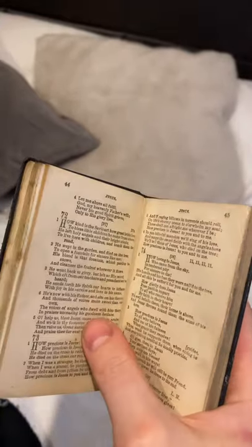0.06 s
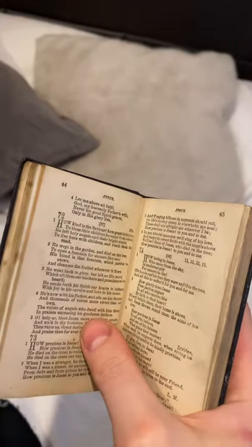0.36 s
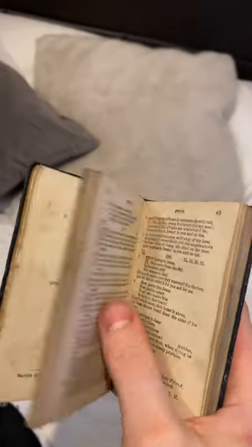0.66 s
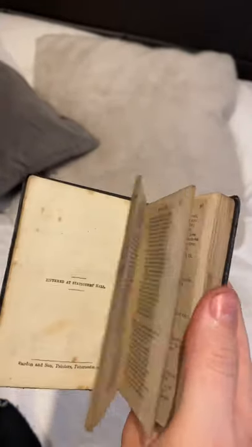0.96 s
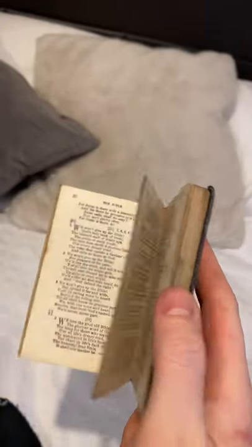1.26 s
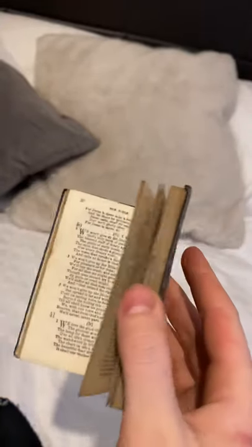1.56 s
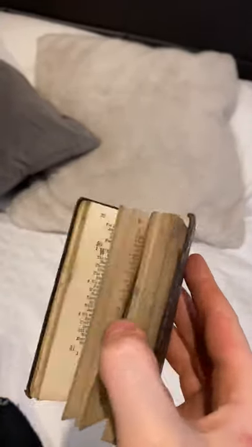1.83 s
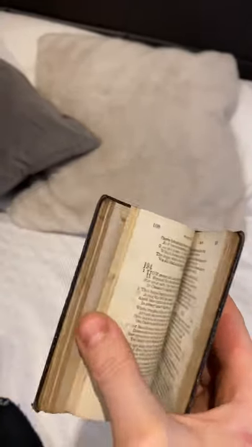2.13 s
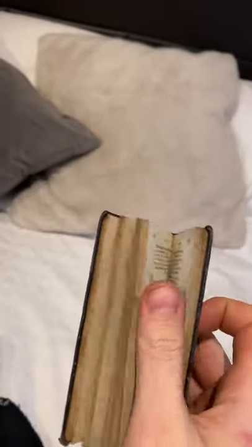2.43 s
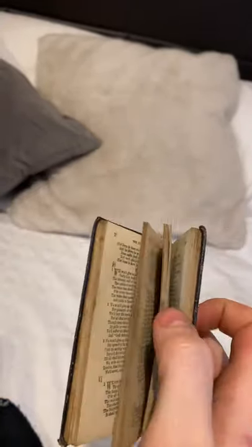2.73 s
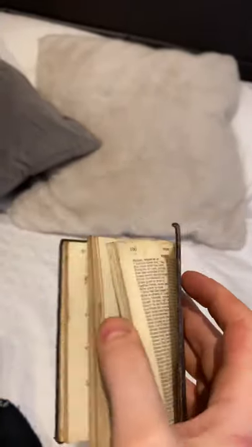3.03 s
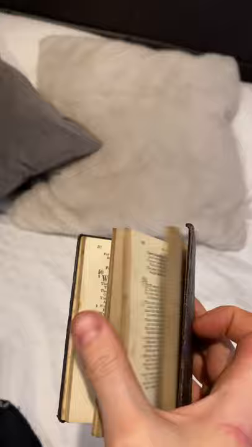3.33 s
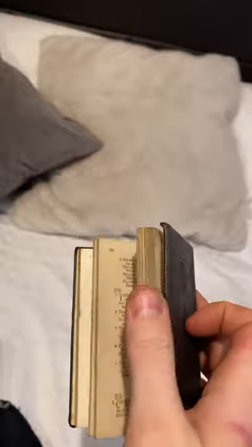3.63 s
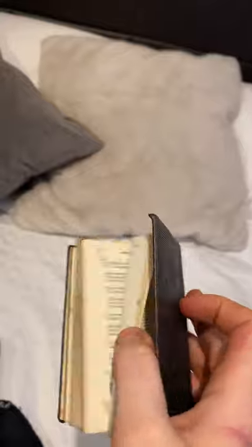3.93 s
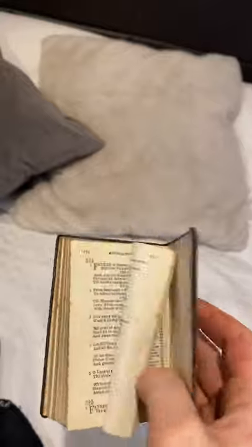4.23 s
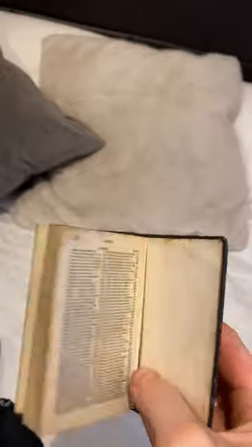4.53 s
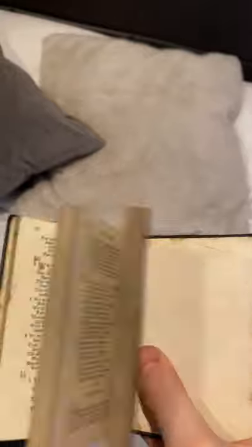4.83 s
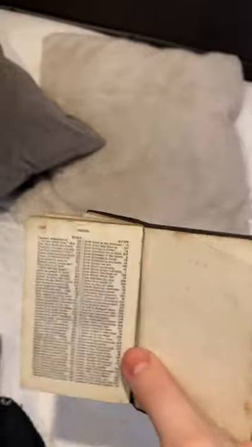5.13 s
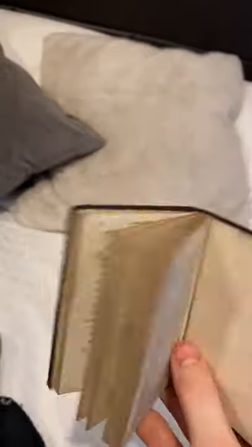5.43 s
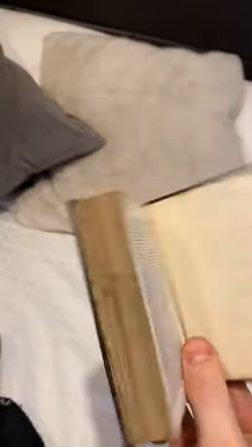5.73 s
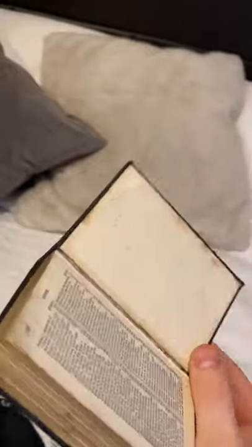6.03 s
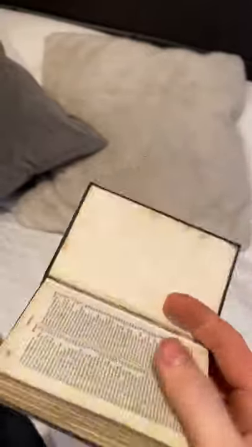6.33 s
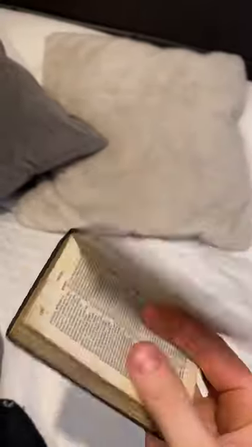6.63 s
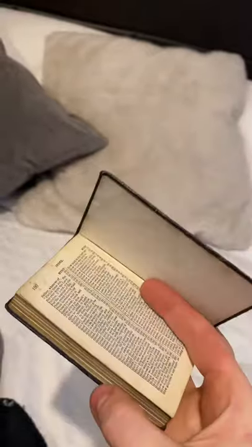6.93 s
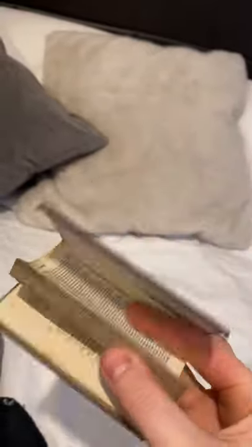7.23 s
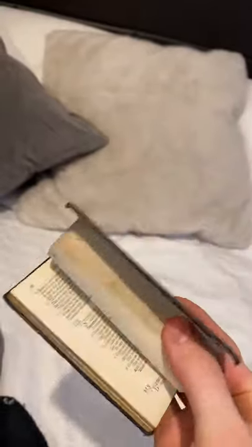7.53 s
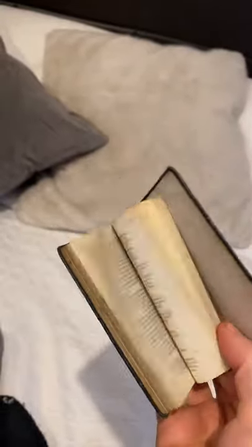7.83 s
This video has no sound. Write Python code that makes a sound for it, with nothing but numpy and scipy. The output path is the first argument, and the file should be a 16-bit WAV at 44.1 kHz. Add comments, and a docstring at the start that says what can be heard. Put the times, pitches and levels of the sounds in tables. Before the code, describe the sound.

Soft, papery swishes come and go as the pages of an old book are thumbed near the microphone in a quiet bedroom. Small dry clicks from the binding and gentle handling bumps dot the rustling. A crisp page snap stands out midway, and a second comes near the end, followed by a last flurry of paper. Dull room tone and a faint hum lie underneath.

```python
"""The pages of a small old book, leafed through in one hand close to a phone in a quiet bedroom.
Paper hisses on paper, bending sheets rustle, and the thumb rubs dully over their edges.
The dry binding ticks as its folds give way, and a few leaves snap free of the thumb.
The hand gives some soft bumps; underneath lies a dull room tone with a low steady mains hum."""
import sys
import numpy as np
from scipy import signal
from scipy.fft import rfft, irfft
from scipy.io import wavfile

SR = 44100
rng = np.random.default_rng(int(sys.argv[2]) if len(sys.argv) > 2 else 0)


def digitize_waveform(pressure):
    """Quantize a signal to 16-bit integers and store it at the path in sys.argv[1].

    Rows of a 2-D input are taken as channels; values are limited to [-1, 1].
    """
    field = np.atleast_2d(pressure).T
    bounded = np.clip(field, -1, 1)
    quanta = np.round(bounded * 32767).astype(np.int16)
    wavfile.write(sys.argv[1], SR, quanta)


N = 347067
T = np.arange(N) / SR
HZ = np.maximum(np.fft.rfftfreq(N, 1 / SR), 1)

# tone colour of the room's rush: f/Hz, relative level/dB
ROOM_COLOUR = [(20, -22), (36, -3), (55, 1), (120, 6), (160, -1), (220, 4.5), (350, -4.5), (560, 4),
               (740, -8), (900, -3), (1150, -17), (2000, -29), (3500, -35), (4900, -37), (5900, -34.5),
               (7200, -41.5), (10000, -49), (16000, -57)]
# narrow room resonances: f/Hz, width/Hz, relative level/dB
ROOM_MODES = [(118.4, 11, -83.5), (193.1, 11, -64), (231.6, 12, -68.5), (300.2, 26, -65.5), (400, 13, -63),
              (447.5, 14, -70.5), (507, 14, -76), (541.6, 10, -64), (579.5, 12, -69), (662, 36, -66.5),
              (868.4, 48, -65.5)]
# stereo image of the room, mono in the bass and wide on top: f/Hz, left-right correlation
ROOM_CORRELATION = [(50, 0.99), (130, 0.96), (290, 0.89), (640, 0.35), (1400, 0), (4000, 0), (12000, 0.081)]
# partials of the mains hum: f/Hz, rms level/dB
HUM_PARTIALS = [(50, -71.5), (100, -70)]
# the book as the two microphone ports hear it: f/Hz, left lead/rad, left minus right/dB
MIC_PORTS = [(100, 0, 0), (700, -.4, -1), (1250, -.2, -2.5), (2000, .45, -1.8), (3100, 1.25, -4.5),
             (4250, 1.1, 0), (4700, .9, -2.5), (5200, .6, 2), (5800, .65, 0), (8000, 1.5, 0),
             (10000, 2.2, 0), (12000, 2.92, 0), (13500, 3.02, 0), (16000, 3.08, 0)]
# soft bumps of hand and book: t/s, level/dB, f/Hz, length/s
HAND_BUMPS = [(0.589, -37, 47.9, 0.19), (0.592, -37.5, 95.2, 0.066), (1.942, -40, 60.8, 0.017),
              (2.412, -43, 414, 0.0085), (4.284, -42.5, 145, 0.029), (4.289, -46, 68, 0.067),
              (4.286, -43.5, 395, 0.026), (5.53, -45, 65.5, 0.031), (6.659, -39.5, 126.5, 0.012),
              (6.663, -36, 190, 0.013), (7.495, -45.5, 72, 0.051), (7.496, -49, 360, 0.015),
              (7.837, -42, 397, 0.009)]
# ticks of the binding and of stiff leaves:
# t/s, relative level/dB, ring f/Hz, low-pass f/Hz, crackle over click/dB, ring half-width/octaves
FOLD_TICKS = [(0.031, -44, 1170, 4000, -6.5, 0.85), (0.25, -43.5, 1700, 2250, -8, 0.42),
              (0.3035, -33, 2200, 2980, -15, 0.55), (0.317, -41.5, 1960, 3300, -6, 0.43),
              (1.204, -52.5, 1500, 2500, -10, 0.4), (1.259, -52, 1370, 3000, -7, 0.18),
              (1.638, -49, 1500, 3500, -12, 0.43), (1.8776, -46.5, 1270, 4000, -12, 0.28),
              (1.9315, -40, 1840, 3000, -6, 0.22), (1.9359, -21, 2000, 3040, -16.5, 0.23),
              (1.9411, -29.5, 1810, 3000, -5, 0.23), (1.9753, -35, 1720, 2820, -22, 0.24),
              (2.4114, -29, 1070, 3480, -10.5, 0.43), (2.418, -43, 1170, 2800, -1, 0.33),
              (2.423, -39, 1100, 1800, -7, 0.51), (2.44, -47, 1260, 2500, -6, 0.38),
              (2.6789, -25.5, 1220, 2060, -44, 0.28), (2.743, -30.5, 1140, 1770, -1, 0.37),
              (2.744, -30, 1180, 2035, -31, 0.35), (2.754, -36, 1210, 1720, -10, 0.38),
              (2.8, -45, 1210, 1700, -14, .4), (3.085, -26.5, 1720, 6000, -9, 0.4),
              (3.0963, -25.5, 1640, 5530, -9.5, 0.35), (3.331, -49, 1250, 2200, -12, 0.37),
              (3.425, -42, 1140, 2400, -11, 0.38), (3.449, -43.5, 1220, 2030, -5.5, 0.31),
              (3.604, -47, 1070, 1603, -7, 0.32), (3.8787, -43.5, 1330, 5000, -2.5, 0.47),
              (4.269, -31.5, 1950, 3500, -1, .25), (4.284, -20, 1030, 11000, -11.5, 0.3),
              (4.2861, -5, 8300, 15500, -21.5, .4), (4.2868, -6.5, 5400, 13000, -25, .45),
              (4.288, -12.5, 4000, 9000, -13, 0.4), (4.2934, -23.5, 2380, 6000, -2, 0.4),
              (4.6734, -43, 1070, 5000, -11, 0.29), (4.844, -47, 1300, 3000, -3, 0.33),
              (5.113, -44.5, 2260, 9000, -9, 0.36), (5.449, -38, 1545, 2950, 4.5, 0.33),
              (5.513, -42.5, 1950, 6100, -9, 0.32), (5.847, -41, 1270, 3500, -12, 0.52),
              (6.2192, -28, 2700, 9900, -20, 0.39), (7.239, -32, 905, 2400, -14, 0.31),
              (7.4915, -25.5, 1470, 4000, -0.5, 0.89), (7.4953, -8, 2640, 6900, -27, 0.26),
              (7.4956, -12.5, 1660, 3500, -19, 0.26), (7.75, -48, 1920, 12200, -19, 0.56),
              (7.834, -21, 1200, 7950, -23, 0.46), (7.845, -30, 2390, 6000, -9, 0.35),
              (7.8486, -26, 2370, 12000, -14, 0.32), (7.8602, -32, 2640, 12000, -3, 0.42)]
# leaf edges snapping free: t/s, level/dB, drag/s, lift of the highest treble/dB
EDGE_FLICKS = [(0.599, -59, .00018, 12), (1.6367, -50, 0.00022, -12), (1.8143, -61, 0.00022, 8),
               (1.8213, -67, .0002, 8), (1.8751, -55.5, 0.00062, 14), (1.935, -38.5, 0.0032, 0),
               (2.072, -55, .0002, -2), (2.147, -53, 0.00018, 9), (2.9953, -57, 0.00018, 8),
               (3.084, -55, 0.00042, -11), (3.0958, -55, .0003, -5), (3.78, -67, .0002, 15),
               (3.9151, -50.5, 0.01, -3), (3.919, -57, .0003, 5), (4.263, -31, .002, 0),
               (4.272, -30, 0.0026, 9), (4.2859, -12.5, .0004, -6), (4.2886, -19.5, 0.00069, -10),
               (4.4456, -60, .0004, 9), (4.4772, -49, 0.00023, 12), (4.5, -48.5, 0.00073, 8),
               (4.6816, -61, .0008, 15), (4.798, -61, .0003, 9), (4.814, -63, .0004, 7),
               (4.8368, -43.5, 0.00052, 7), (4.876, -60, .0004, 1), (4.8883, -52, .0003, 3),
               (5.4535, -50, 0.00033, 10), (5.4607, -53, .0002, 5), (5.511, -55, .0002, 7),
               (5.574, -51, 0.00029, -13), (6.2188, -35, 0.00016, 6), (6.6576, -44, 0.00025, 18),
               (7.476, -40, .0057, 1), (7.4957, -22, 0.00038, -1), (7.7508, -53, 0.00033, -2)]
# tone colours of thumb rub, bending sheet, paper hiss and edge flick: f/Hz, relative level/dB
RUB_COLOUR = [(300, -11.5), (750, -8.5), (1250, -4.5), (1600, -5.5), (2200, -25.5), (4000, -35.5)]
FLEX_COLOUR = [(700, -24.5), (1400, 5.5), (1950, 8.5), (2900, 6), (3800, 4), (6000, -13.5), (12000, -42)]
HISS_COLOUR = [(1000, -23), (2500, -13.5), (4200, 7), (4800, -2.5), (5300, 6.5), (6400, 5.5), (7600, 3),
               (9500, 5.5), (12500, 4.5), (14500, 3), (15800, 0)]
FLICK_COLOUR = [(150, -4), (500, -22.5), (1000, -5), (1500, -10.5), (2400, 4), (3200, -6), (4500, 1.5),
                (7300, 3.5), (9500, 2), (12000, 1), (15500, -1)]
# the first leaf swings open, then the leaves stay loosely fanned: t/s, gap/m
LEAF_GAP = [(.59, 0.0083), (.9, 0.092), (1.3, .05)]
# voice of the moving sheet: t/s, papery resonance f/Hz, resonance height/dB, hiss centre f/Hz
SHEET_SHAPE = [(.62, 2800, 6.5, 9380), (.76, 3230, 10.5, 7480), (1.0, 2320, -1, 5950),
               (1.94, 1954, 0.5, 6460), (2.2, 1850, 2.5, 6280), (3.1, 2314, 1.5, 5400),
               (3.75, 1702, 2.5, 5990), (3.95, 1904, 15.5, 7920), (4.22, 2250, 8, 6660),
               (4.4, 2280, 4, 7040), (5.0, 2112, 3, 6820), (5.24, 2700, 7, 7500), (5.45, 1924, 2.5, 6970),
               (5.75, 2240, 4, 6020), (5.92, 2030, 4, 9170), (6.3, 2620, 0.5, 7660), (6.5, 2435, 1.5, 6700),
               (7.25, 2283, 1, 6520), (7.35, 3960, 4.5, 5430), (7.45, 4040, 11.5, 7220),
               (7.55, 2580, 10, 5980), (7.83, 2700, 5.5, 6260)]
# slides of leaves and thumb:
# start t/s, rise/s, fall/s, flex level/dB, hiss over flex/dB, rub over flex/dB
PAGE_SLIDES = [(0, 0.0065, 0.086, -68, -2, -31), (.09, 0.0065, 0.018, -68.5, -3.5, -3),
               (0.595, 0.0044, 0.033, -64.5, -3.5, -20), (.607, 0.023, 0.087, -61.5, 0, -30),
               (.64, 0.052, 0.16, -65, 6, -28), (.76, 0.13, 0.15, -74.5, 3.5, -4),
               (1.015, 0.064, 0.18, -74, -1.5, -2), (1.25, 0.016, 0.031, -73, -0.5, -5),
               (1.53, 0.19, 0.055, -72.5, -1.5, 0), (1.8, 0.017, .1, -81.5, 4, 4),
               (1.85, 0.023, .01, -72.5, 6.5, -5), (1.857, 0.12, 0.044, -55, -5, -6),
               (2.0, 0.092, 0.033, -66, 2.5, -2), (2.118, 0.058, 0.15, -59.5, 3, -5),
               (2.28, 0.06, 0.1, -64.5, 0.5, -6), (2.379, 0.019, 0.17, -72, -3.5, 12.5),
               (2.484, 0.014, 0.1, -63.5, -2, -2), (2.58, 0.055, 0.1, -68, -3.5, 5),
               (2.7, 0.059, 0.42, -87.5, -3, 20), (2.98, 0.031, 0.051, -65.5, -2, -1),
               (3.037, 0.034, 0.11, -56.5, -5.5, -3), (3.132, 0.045, 0.08, -58.5, -3, 0),
               (3.24, 0.033, 0.09, -68, 0, 2.5), (3.355, 0.028, 0.1, -71.5, -3.5, 10),
               (3.485, 0.014, 0.017, -81.5, 4.5, -6), (3.58, 0.19, 0.15, -74, -8, 5.5),
               (3.874, 0.062, 0.17, -61.5, 0.5, -7), (4.139, 0.095, 0.13, -59.5, 5, -39),
               (4.22, 0.05, 0.017, -49.5, 0.5, -35), (4.285, 0.006, 0.091, -62.5, 4, 6.5),
               (4.321, 0.11, 0.4, -70, 5, 4), (4.51, 0.092, 0.045, -64, 2, 3),
               (4.639, 0.063, 0.18, -68, 1.5, 5.5), (4.672, .007, 0.017, -73, 7, 8),
               (4.789, 0.037, 0.044, -69, 6, 8), (4.875, 0.035, 0.14, -67, -1, 2.5),
               (4.901, 0.1, 0.065, -62.5, 5.5, -9), (5.001, 0.046, 0.035, -60.5, -0.5, -9),
               (5.11, 0.037, .04, -82, -3.5, 2), (5.16, 0.021, 0.12, -69, 6, 0.5),
               (5.213, 0.024, 0.029, -56, -2, -3), (5.27, 0.046, 0.0644, -67, 2.5, 6),
               (5.372, 0.042, 0.063, -59, 2.5, -1), (5.44, 0.022, 0.1, -62.5, -0.5, 5.5),
               (5.52, .06, .3, -82, 3.5, -12), (5.67, 0.018, 0.16, -73, 8, -7),
               (5.773, 0.0144, 0.045, -69, 3, -1.5), (5.83, 0.098, 0.08, -68, 8, -5),
               (5.92, 0.069, .016, -68, 5, -5), (5.99, 0.037, 0.27, -74.5, -2.5, -11.5),
               (6.075, 0.084, 0.16, -73, 3.5, 6), (6.193, 0.03, 0.055, -63, 7.5, 0),
               (6.24, 0.075, 0.14, -70.5, 7.5, -1.5), (6.4, 0.075, 0.12, -67.5, 10.5, -4),
               (6.51, 0.046, .045, -72, 7, -5), (6.616, 0.046, 0.04, -63.5, 4.5, -9),
               (6.66, 0.045, .1, -69.5, 2.5, -9), (6.81, 0.073, 0.064, -66.5, -2, -8),
               (6.995, 0.017, 0.05, -64, 1.5, 3.5), (7.05, 0.069, 0.66, -70.5, -4, -3),
               (7.21, 0.056, 0.037, -55, 3, 1), (7.27, .09, 0.12, -59.5, -2.5, -1),
               (7.4, 0.088, 0.008, -52.5, 3.5, -1), (7.49, 0.071, 0.042, -62.5, 6, 3),
               (7.599, 0.039, 0.071, -73.5, 0.5, 6.5), (7.73, 0.049, 0.065, -71.5, -2.5, -4),
               (7.793, 0.0075, 0.15, -53, 8.5, -6), (7.82, 0.042, .1, -49.5, 6.5, 2.5)]


def from_db(db):
    """Decibels to gain."""
    return 10 ** (np.asarray(db) / 20)


def unit_rms(x):
    """Scale to rms 1."""
    return x / np.sqrt(np.mean(x ** 2) + 1e-20)


def over_hz(rows):
    """A table's columns as smooth curves over log frequency."""
    hz, *columns = np.transpose(rows)
    return [np.interp(np.log(HZ), np.log(hz), column) for column in columns]


def colour(noise, spectrum):
    """EQ a steady noise to a tone colour, at rms 1."""
    return unit_rms(irfft(rfft(noise) * from_db(over_hz(spectrum)[0]), N))


def butter(x, hz, kind):
    """A gentle causal filter, 12 dB per octave."""
    return signal.sosfilt(signal.butter(2, np.clip(hz, 10, .45 * SR), kind, fs=SR, output="sos"), x)


def ring(x, hz, octaves):
    """A damped resonance, the given octaves wide to either side."""
    return butter(x, [hz / 2 ** octaves, hz * 2 ** octaves], "band")


def bell(hz, centre_hz, octaves):
    """A bell EQ curve: 1 at its centre, half as high the given octaves away."""
    return 1 / (1 + (np.log2(hz / centre_hz) / octaves) ** 2)


def drift(rate_hz):
    """A slow random wobble at rms 1."""
    return unit_rms(irfft(rfft(rng.standard_normal(N)) / (1 + (HZ / rate_hz) ** 2), N))


def add(track, s, sound):
    """Lay a sound into a track at s seconds."""
    start = max(round(s * SR), 0)
    track[start:start + len(sound)] += sound[:max(N - start, 0)]


def room_tone(rush_db=-58, modes_trim_db=-5.5):
    """The bed: a dull diffuse rush with narrow resonances, and mains hum."""
    correlation = np.clip(over_hz(ROOM_CORRELATION)[0], -1, 1)
    mid, side = rfft(rng.standard_normal((2, N)))
    field = np.sqrt(1 + correlation) * mid + np.sqrt(1 - correlation) * side * [[1], [-1]]
    rush = from_db(rush_db) * unit_rms(from_db(over_hz(ROOM_COLOUR)[0]))
    modes = [from_db(db + modes_trim_db) * unit_rms(1 / (1 + (2 * (HZ - hz) / width) ** 2))
             for hz, width, db in ROOM_MODES]
    power = rush ** 2 + np.sum(np.square(modes), axis=0)
    air = irfft(field * np.sqrt(power / 2), N)
    hum = sum(from_db(db) * np.sqrt(2) * np.sin(2 * np.pi * hz * T) for hz, db in HUM_PARTIALS)
    return air + hum


def bedroom_reverb(send, t60_s=0.2, wall_hz=7500, predelay_s=.003):
    """The bedroom answers with a short soft tail, different on each side."""
    t = T[:SR // 3]
    noise = butter(rng.standard_normal((2, len(t))), wall_hz, "low")
    tail = noise * from_db(-60 * t / t60_s) * (t > predelay_s)
    tail /= np.sqrt(np.sum(tail ** 2) / 2)
    return signal.fftconvolve(send[None], tail, axes=1)[:, :N]


def at_ports(x, off_axis):
    """Close sound meets two ports at different levels; the further off axis, the more the left leads."""
    lead, balance_db = over_hz(MIC_PORTS)
    half = np.array([[.5], [-.5]])
    return irfft(rfft(x) * from_db(half * balance_db) * np.exp(1j * half * lead * off_axis), N)


def hand_bumps():
    """Each bump sets off a low swing that dry friction brings to a stop at a steady rate."""
    track, t = np.zeros(N), T[:SR]
    for s, db, hz, length_s in HAND_BUMPS:
        fade = np.maximum(1 - t / length_s, 0)
        add(track, s, -from_db(db) * fade * np.sin(2 * np.pi * hz * t))
    return track


def fold_ticks(overtone_ratio=2.25, overtone_db=-15, crack_db=-24, knock_db=1, knock_hz=800,
               strain_s=0.00022, crackle_s=0.0059, rebound=0.15, trim_db=-2.5):
    """A stiff fold strains, gives way and rings briefly in two damped modes; small slips follow."""
    track = np.zeros(N)
    t = T[:SR // 14] - T[SR // 100]   # the fold gives way at t = 0
    impulse = t == 0
    slip_envelope = np.exp(np.minimum(t / strain_s, -t / crackle_s))
    for s, db, ring_hz, lowpass_hz, crackle_db, octaves in FOLD_TICKS:
        # the fold springs back two cycles later
        blow = impulse + rebound * np.roll(impulse, round(2 * SR / ring_hz))
        slips = rng.standard_normal(len(t)) * slip_envelope
        force = np.array([blow, slips])
        force = butter(butter(force, lowpass_hz, "low"), lowpass_hz, "low")   # padding dulls the contact
        overtone = from_db(overtone_db) * ring(force, overtone_ratio * ring_hz, octaves=0.18)
        # the more the block of pages damps the ring, the more it knocks below it
        knock = from_db(knock_db) * octaves ** 2.1 * butter(force, knock_hz, "low")
        crack = from_db(crack_db) * force
        click, crackle = ring(force, ring_hz, octaves) - overtone - knock - crack
        tick = click / abs(click).max() + from_db(crackle_db) * crackle / abs(crackle).max()
        add(track, s - T[np.argmax(abs(click))], from_db(db) * tick)
    return from_db(trim_db) * track


def edge_flicks(body_hz=4500, top_hz=9500, body_life=3.67, treble_life=0.49):
    """An edge drags ever faster off the thumb and cracks free in a burst whose treble dies first."""
    envelopes, t = np.zeros((3, N)), T[:SR // 10] - 1 / 20
    lives = (body_life, treble_life, treble_life)   # multiples of the decay, for body, treble and top
    for s, db, drag_s, crisp_db in EDGE_FLICKS:
        decay_s = 0.0011 * (drag_s / .001) ** 0.62   # a longer drag frees more edge and dies more slowly
        for envelope, life, lift_db in zip(envelopes, lives, (0, 0, crisp_db)):
            snap = np.exp(np.minimum(t / drag_s, -t / (decay_s * life)))
            add(envelope, s + t[0], from_db(db + lift_db) * snap)
    burst = colour(rng.choice([-1., 1.], N), FLICK_COLOUR)
    body = irfft(rfft(burst) / (1 + (HZ / body_hz) ** 4), N)
    top = irfft(rfft(burst) / (1 + (top_hz / HZ) ** 8), N)   # the crispness of a thin edge
    treble = burst - body - top
    return envelopes[0] * body + envelopes[1] * treble + envelopes[2] * top


def friction(spectrum, catches_per_s, catch_share, flutter_db):
    """Countless fibres brush past each other; now and then one catches and lets go harder."""
    sizes = from_db(4 * np.minimum(rng.exponential(1, N), 4)) * rng.choice([-1, 1], N)
    catches = unit_rms(sizes * (rng.random(N) < catches_per_s / SR))
    grains = rng.standard_normal(N) + catch_share * catches
    return unit_rms(colour(grains, spectrum) * from_db(flutter_db * drift(rate_hz=27)))


def slide_speed(rise_s, fall_s, rise_power=0.96, fall_power=1.27):
    """A slide gathers speed, then comes to rest: 20 dB down after its fall time."""
    t = T[:SR]
    attack = np.sin(np.pi / 2 * np.minimum(t / rise_s, 1)) ** rise_power
    release = from_db(-20 * (np.maximum(t - rise_s, 0) / fall_s) ** fall_power)
    return attack * release


def slide_gains(grip_db=-93, grip_waver_db=1):
    """Envelopes of flex, hiss and rub: slides add in power over paper faintly shifting in the grip."""
    grip = from_db(grip_db - grip_waver_db * drift(rate_hz=3))
    power = np.tile(grip ** 2, (3, 1))
    for start_s, rise_s, fall_s, db, hiss_db, rub_db in PAGE_SLIDES:
        speed = slide_speed(rise_s, fall_s)
        for track, above_db in zip(power, (0, hiss_db, rub_db)):
            add(track, start_s, (from_db(db + above_db) * speed) ** 2)
    return np.sqrt(power)


def shaped_by_sheet(flex, hiss, grazing_db, hollow_share=0.26, hiss_peak_db=6,
                    gap_waver=.18, ripple_db=1.5, sizzle_hz=11000, sound_m_per_s=343):
    """The sheet's free span tunes a papery resonance, and the echo between leaves combs the hiss."""
    hz, t, (flex, hiss) = signal.stft([flex, hiss], SR, nperseg=256)
    hz = np.maximum(hz, 1)[:, None]
    times, *columns = np.transpose(SHEET_SHAPE)
    centre_hz, height_db, hiss_hz = [np.interp(t, times, column) for column in columns]
    flex = flex * from_db(height_db * (bell(hz, centre_hz, octaves=.33) - hollow_share))
    wander = np.exp(gap_waver * np.interp(t, T, drift(rate_hz=0.86)))
    gap_m = np.interp(t, *np.transpose(LEAF_GAP)) * wander
    comb_db = ripple_db * np.cos(2 * np.pi * hz * 2 * gap_m / sound_m_per_s)
    # a grazing edge lifts the very top: the more hiss over flex, the more sizzle
    sizzle_db = (np.interp(t, T, grazing_db) - 1) / (1 + (sizzle_hz / hz) ** 6)
    hiss = hiss * from_db(sizzle_db + comb_db + hiss_peak_db * bell(hz, hiss_hz, octaves=0.47))
    return [unit_rms(layer[:N]) for layer in signal.istft([flex, hiss], SR)[1]]


def sliding_pages():
    """Three friction layers: a dull thumb rub, the mid rustle of bending sheets, paper-on-paper hiss."""
    flex_gain, hiss_gain, rub_gain = slide_gains()
    rub = friction(RUB_COLOUR, catches_per_s=160, catch_share=0.56, flutter_db=3.5)
    flex = friction(FLEX_COLOUR, catches_per_s=1100, catch_share=0.21, flutter_db=1.5)
    hiss = friction(HISS_COLOUR, catches_per_s=330, catch_share=0.6, flutter_db=2.5)
    flex, hiss = shaped_by_sheet(flex, hiss, grazing_db=20 * np.log10(hiss_gain / flex_gain))
    return rub_gain * rub + flex_gain * flex + hiss_gain * hiss


def scene():
    """The mix: broad sheets scatter more into the room than the small clicks close to the phone."""
    pages = sliding_pages()
    clicks = fold_ticks() + edge_flicks()
    close = at_ports(pages + hand_bumps(), off_axis=1) + at_ports(clicks, off_axis=0.93)
    reverb_send = from_db(-16.5) * pages + from_db(-23.5) * clicks
    return close + bedroom_reverb(reverb_send) + room_tone()


def record(dry, bass_cut_hz=33, top_cut_hz=15900):
    """The microphone loses the deepest bass; the top is cut steeply."""
    lean = butter(butter(dry, bass_cut_hz, "high"), bass_cut_hz, "high")
    return signal.sosfilt(signal.ellip(10, .1, 70, top_cut_hz, fs=SR, output="sos"), lean)


dry = scene()
out = record(dry)
digitize_waveform(out)
```